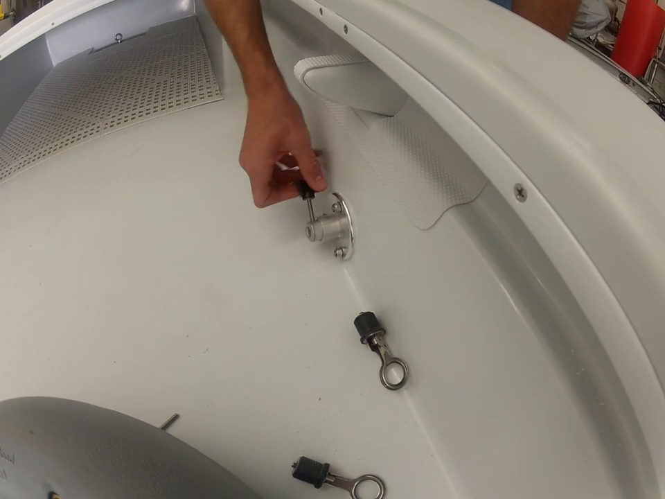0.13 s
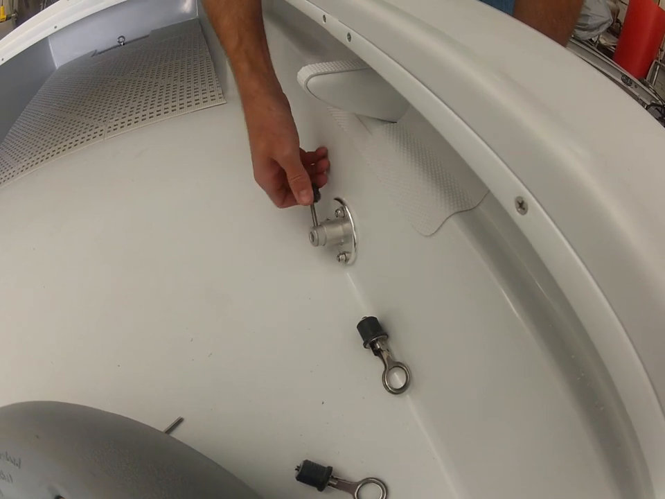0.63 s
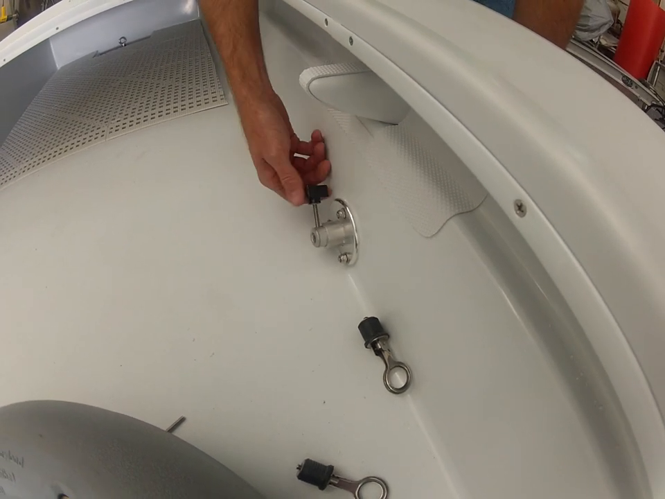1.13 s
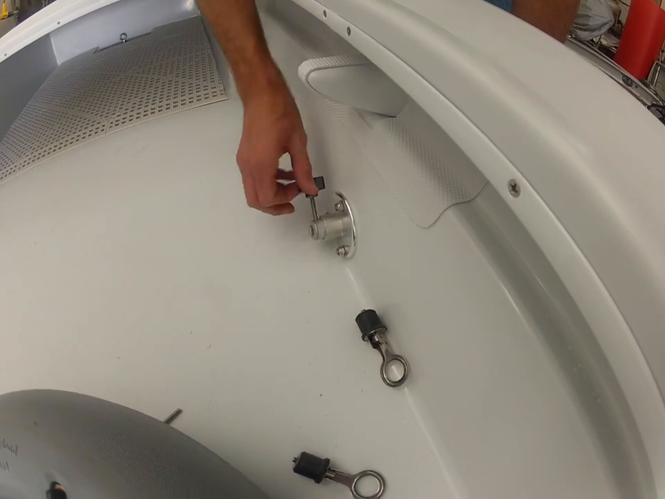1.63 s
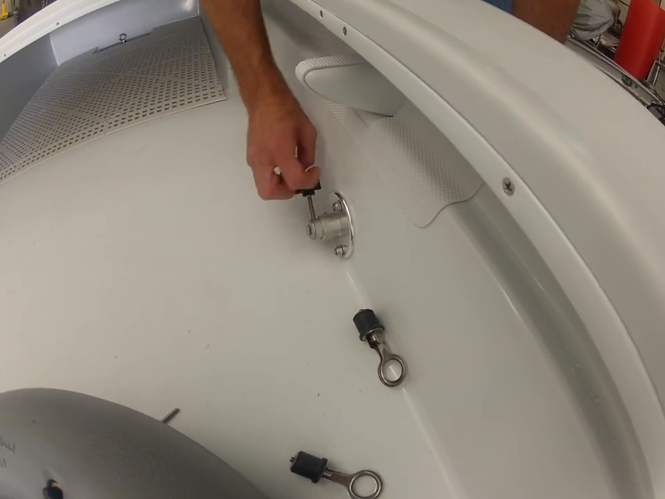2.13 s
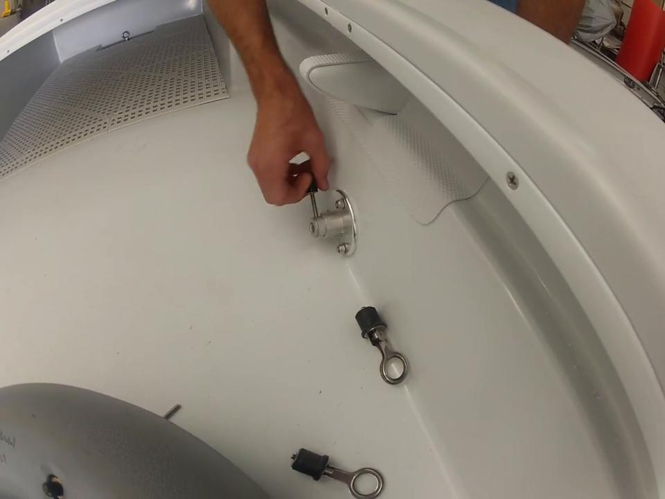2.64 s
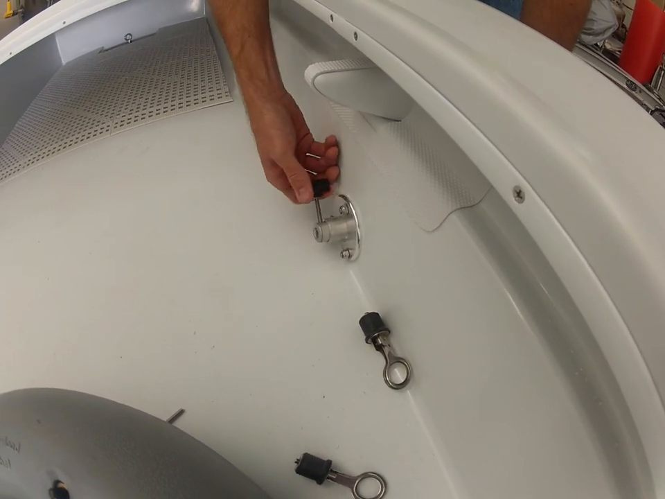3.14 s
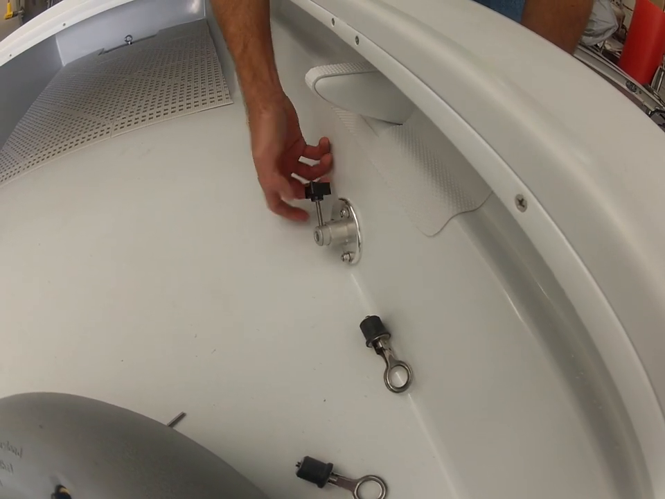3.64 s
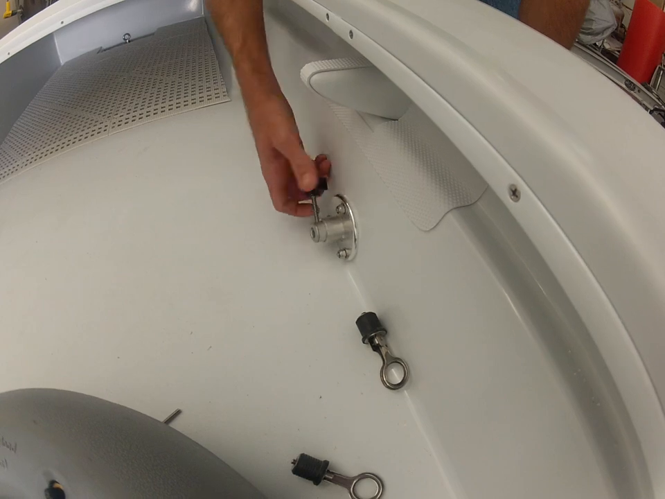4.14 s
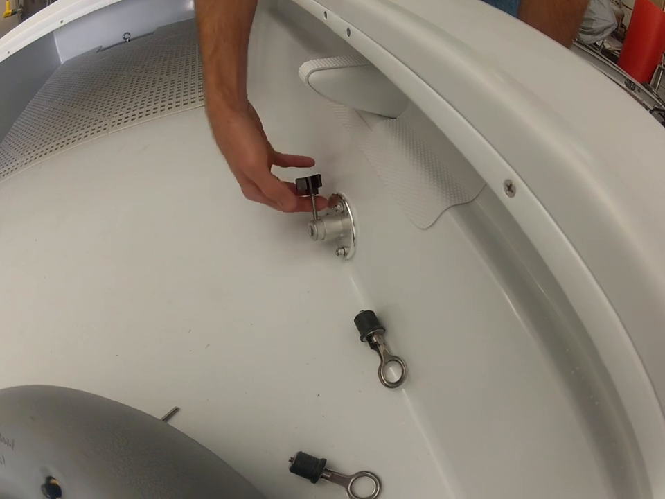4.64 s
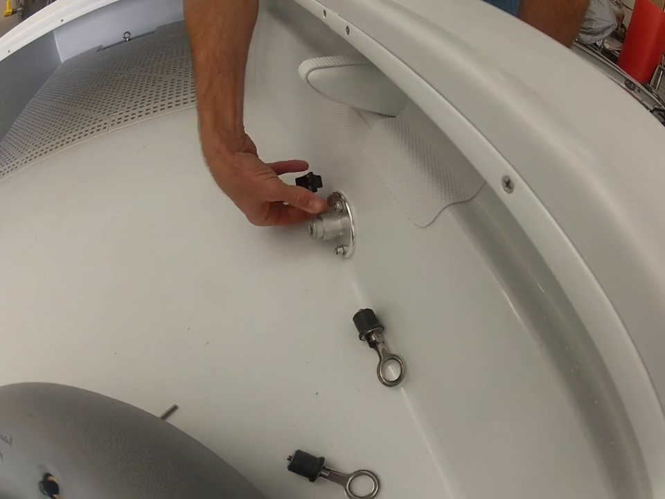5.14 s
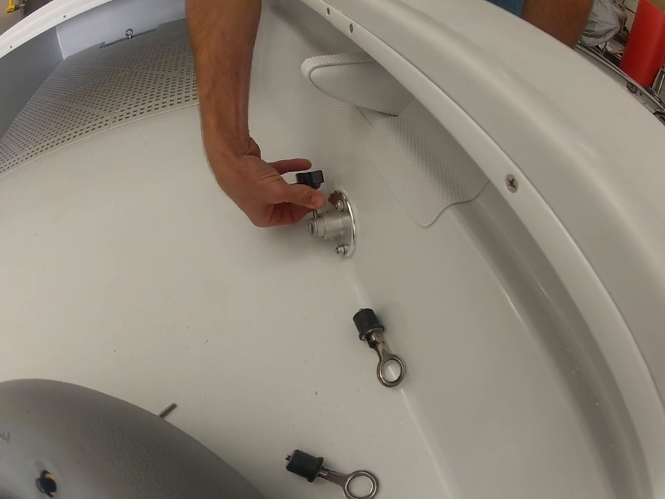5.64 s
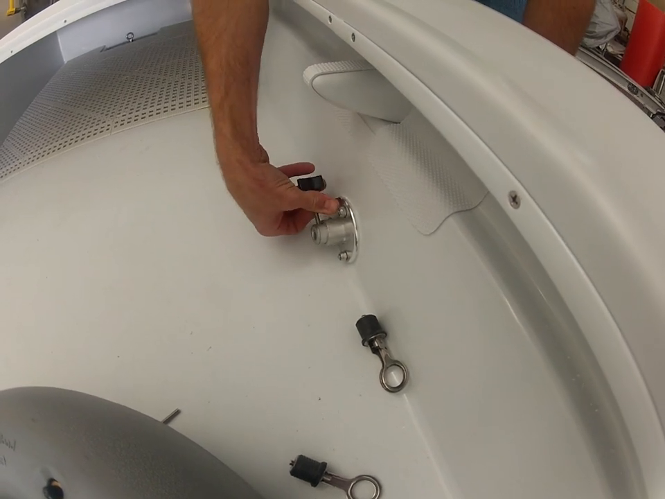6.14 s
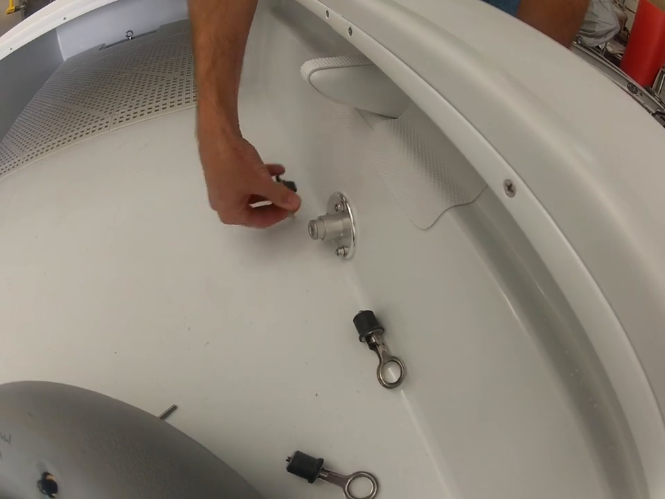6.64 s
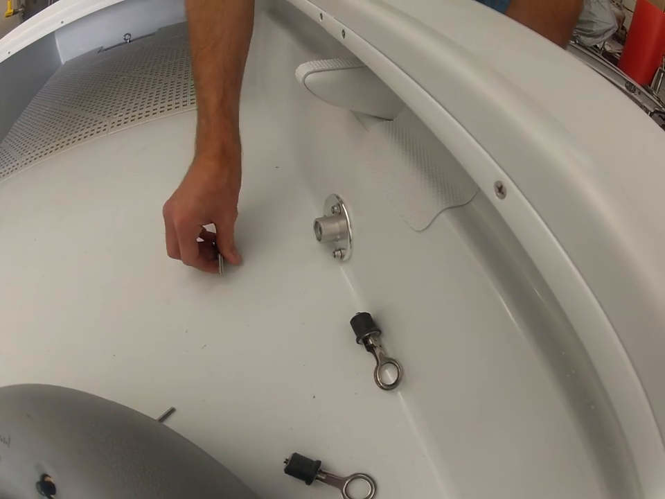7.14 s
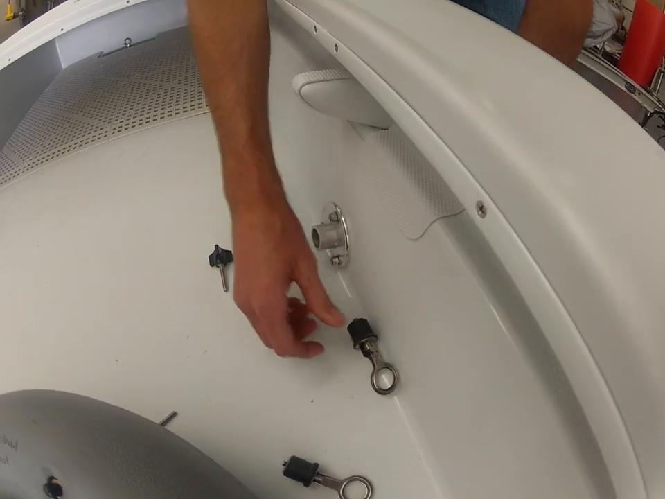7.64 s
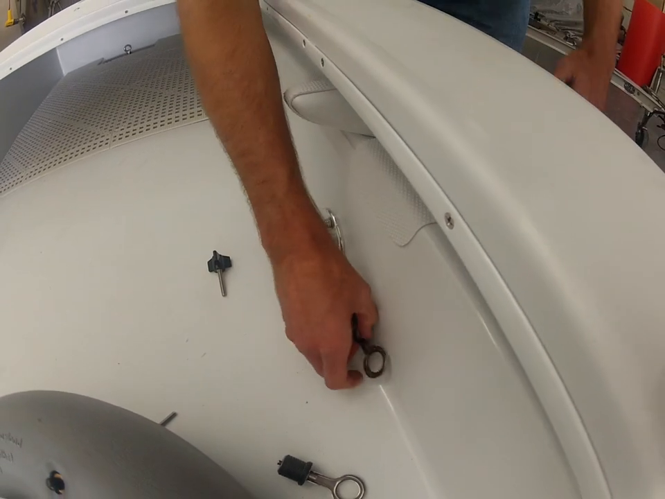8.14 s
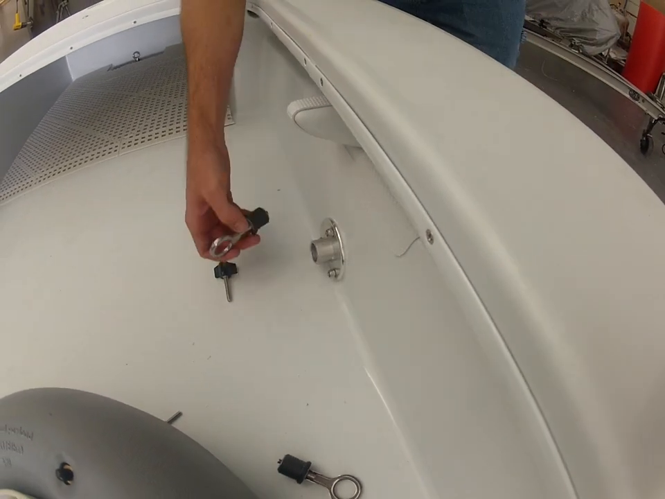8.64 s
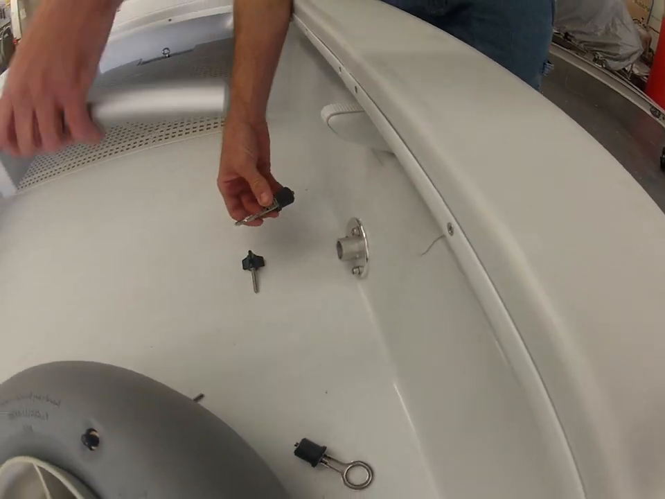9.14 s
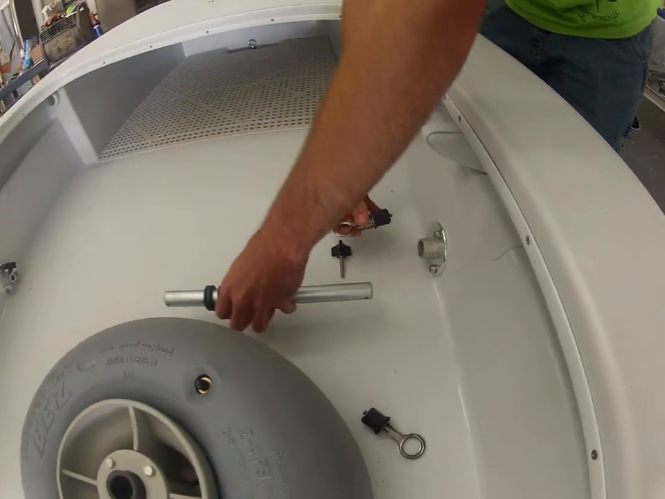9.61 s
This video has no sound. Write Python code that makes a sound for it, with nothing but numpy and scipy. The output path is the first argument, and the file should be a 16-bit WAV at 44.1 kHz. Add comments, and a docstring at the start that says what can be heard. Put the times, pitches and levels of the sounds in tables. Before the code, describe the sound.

Steady soft hiss and a low, drifting rumble from a cheap camera microphone run throughout, with a coarse, mirrored grit in the treble. From 0 to 2 seconds only a few barely audible steel ticks are heard. Around 2.4 to 3.3 seconds the clicks of a small pin in its bracket become slightly clearer, with another at 3.8 seconds followed by a very faint rub. Light irregular ticking continues from 4.4 to 6.4 seconds. At 7.0 to 7.4 seconds the pin is laid down: firmer taps, soft low hull thumps and short lumpy scrapes, strongest near 7.3. Another little drag and tap follow at 7.6, then clicks at 8.0 and 8.2. At 8.28 seconds one sharp, much louder steel knock hits the hull, hollow and briefly booming, with a smaller bounce at 8.34. Its short shed tail fades, leaving hiss and rumble that swells slightly towards the end, near 9.75 seconds.

```python
"""A hand turns a small steel pin out of a bracket in a hollow boat, lays it down and knocks a second pin on the hull.
Each contact is a noisy blow, modes near 2 kHz and duller echoes inside the boat; heavy ones thump the hull panels.
Now and then the steel drags in short, lumpy strokes of noise; a shed answers clicks and thumps with a noise tail.
The camera adds hiss and a drifting rumble, samples slowly and holds each sample: sounds are mirrored in the treble."""
import sys
import numpy as np
from scipy import signal
from scipy.fft import rfft, irfft, next_fast_len
from scipy.io import wavfile
from scipy.ndimage import uniform_filter1d, map_coordinates

SR = 44100
rng = np.random.default_rng(int(sys.argv[2]) if len(sys.argv) > 2 else 0)


def bounce(signal):
    """Save signal as a 16-bit WAV file at the path given by the first command-line argument."""
    frames = np.transpose(np.atleast_2d(signal))
    limited = np.clip(frames, -1, 1)
    pcm = np.round(limited * 32767).astype(np.int16)
    wavfile.write(sys.argv[1], SR, pcm)


def voltage_ratio(decibels):
    """Convert decibels (scalar or array-like) to amplitude ratios, 20 dB per decade."""
    exponent = np.asarray(decibels, float) / 20
    return 10 ** exponent


N = 429975  # length [samples]

# noise colour of steel touching steel: (frequency [Hz], relative density [dB per Hz])
CONTACT_COLOUR = [(700, -38.5), (1200, -12), (1600, -12.5), (2200, -1), (2700, -6.5), (3300, -14.5),
                  (3800, -26.5), (4800, -25.5), (5900, -31.5), (8000, -92)]


def unit(x):
    """Scale to rms 1."""
    return x / np.sqrt(np.mean(x ** 2) + 1e-20)


def along(points, hz):
    """Read (Hz, value) points on a log frequency axis."""
    f, v = np.transpose(points)
    return np.interp(np.log(hz + 1), np.log(f + 1), v)


def filtered(x, response):
    """Multiply the spectrum of x by a response of frequency."""
    m = next_fast_len(len(x) + 8192)
    hz = np.fft.rfftfreq(m, 1 / SR)
    return irfft(rfft(x, m) * response(hz), m)[:len(x)]


def noise(spectrum, count):
    """Coloured noise of rms 1."""
    white = rng.standard_normal(count)
    return unit(filtered(white, lambda hz: voltage_ratio(along(spectrum, hz))))


def ring(modes, t, spread_db, tilt):
    """One blow on a body: every mode at a new strength, dying at the rate its width sets."""
    luck_db = rng.normal(0, spread_db, len(modes))
    total = np.zeros(len(t))
    for (hz, width_hz, db), extra_db in zip(modes, luck_db):
        decay = np.exp(-np.pi * width_hz * t)
        total += voltage_ratio(db + extra_db + tilt(hz)) * decay * np.sin(2 * np.pi * hz * t)
    return total


def add(track, s, sound, wet_db):
    """Place a sound at s seconds with its own fresh answer from the shed."""
    wet = voltage_ratio(wet_db) * shed(sound)
    wet[:len(sound)] += sound
    track[round(s * SR):][:len(wet)] += wet


def clicks():
    """Steel on steel: a bright blow, ringing modes, and duller echoes that run round the boat, then stop."""
    # steel contacts: (time [s], level [dB], centre of the favoured modes [Hz],
    # hardness: cut of echoes and ringing under the blow [dB], extra edge near 3 kHz [dB])
    contacts = [(0.016, -57.5, 2250, 3, -5), (0.281, -60, 2090, 3, 3), (0.3, -61.5, 2340, 4, 2),
                (0.856, -60, 2110, 1, 2), (0.9753, -53.5, 2110, 4.5, 6), (2.4428, -46, 2080, 4.5, 4),
                (2.554, -58, 2240, 1, 14), (2.6, -45, 2170, 8, 18), (2.819, -56.5, 2250, 6, 12),
                (2.928, -56.5, 2560, 3, 12), (3.121, -60, 2100, 7, 2), (3.1403, -57.5, 2060, 6, 0),
                (3.301, -56.5, 2100, 3.5, 7), (3.7866, -46, 2100, 5.5, 13), (4.399, -51.5, 2250, 5, 14),
                (4.681, -56.5, 2250, 4, 7), (4.768, -61.5, 2520, 3.5, 8), (4.827, -63, 2590, 4, 4),
                (4.911, -60.5, 1820, 0, 6), (4.977, -59, 1760, 1.5, 10), (5.012, -49.5, 2130, 4.5, 0),
                (5.341, -60.5, 2080, 0.5, 4), (5.695, -57.5, 2080, 1, 0), (6.103, -55.5, 2170, 2, 2),
                (6.1945, -51.5, 1750, 6.5, 18), (6.284, -54.5, 2110, 3, 7), (6.306, -49, 2230, 5, 8),
                (6.431, -54.5, 2130, 2.5, 8), (7.009, -38, 2260, 8, -7), (7.061, -53, 2600, 9, 6),
                (7.16, -56, 2150, 1, 4), (7.1865, -50.5, 2260, 10, -8), (7.29, -52, 2170, 2, -7),
                (7.305, -29.5, 2090, 8, 6), (7.3557, -43, 2180, 6.5, -14), (7.374, -46.5, 2210, 9, -8),
                (7.674, -47.5, 2200, 8, 4), (7.985, -49, 2180, 7, -5), (8.1798, -34, 1950, 5, 5),
                (8.2839, -11, 2100, 10.5, -1), (8.2898, -21.5, 2210, 17, 11), (8.3384, -24.5, 2210, 32, 5),
                (8.349, -32, 2160, 23.5, 5)]
    # modes of pin and bracket: (frequency [Hz], width [Hz], relative level [dB])
    steel_modes = [(1378, 67, -13), (1805, 60, -7.5), (2060, 40, -4.5), (2210, 29.7, -2.5), (2360, 45, -8),
                   (2560, 59, -5.5), (2720, 50.3, -13.5), (2960, 109, -11), (3360, 120, -23),
                   (4810, 200, -24.5)]
    hard_s, soft_extra_s, hardness_fall_db = 0.018, 0.03, 4  # a soft rubbing touch echoes longer than a hard tap
    track, t = np.zeros(N + SR), np.arange(SR // 8) / SR

    def edge(hz):
        """A hard corner wakes the pin's short high mode."""
        return np.exp(-(np.log2((hz + 1) / 3200) / 0.75) ** 2)

    for s, db, centre_hz, hardness_db, edge_db in contacts:
        echo_s = hard_s + soft_extra_s * np.exp(-abs(hardness_db) / hardness_fall_db)

        def tilt(hz):
            """Where the pin is touched decides which modes speak."""
            return np.maximum(-30 * np.log2((hz + 1) / centre_hz) ** 2, -7)

        blow = unit(filtered(noise(CONTACT_COLOUR, len(t)), lambda hz: voltage_ratio(edge_db * edge(hz))))
        blow *= 1 / (1 + (t / 0.0035) ** 5)  # over in a few ms
        blow *= voltage_ratio(6.0) / np.abs(blow).max()

        echoes = unit(filtered(noise(CONTACT_COLOUR, len(t)), lambda hz: voltage_ratio(tilt(hz))))
        echoes *= voltage_ratio(-3.5 - 74 * t) / (1 + (t / echo_s) ** 6)
        echoes *= 1 - np.exp(-(t / 0.0031) ** 2)  # the first walls are a few ms away

        ringing = voltage_ratio(-6.0) * ring(steel_modes, t, 5.0, tilt)
        sound = blow + voltage_ratio(-hardness_db) * (echoes + ringing)
        onset = 1 - np.exp(-t / 0.0011)
        add(track, s - 0.0008, voltage_ratio(db) * sound * onset, wet_db=-12.5)
    return track[:N]


def thumps():
    """A heavier contact sets the hull panels booming: ringing modes and bands of noise that swell and die."""
    # hull thumps: (time [s], level [dB], brightness [dB per octave], factor on the band decay times [ratio])
    knocks = [(0.302, -46, -3, 0.33), (3.787, -47, -4, 0.67), (4.399, -49.5, -1.5, 0.8),
              (7.009, -42.5, -4, 1.54), (7.061, -41, -8, 0.86), (7.19, -51.5, 0, 1.7),
              (7.304, -39.5, -4.5, 0.98), (7.36, -51, -7, 0.94), (7.66, -48.5, -3.5, 1.2),
              (8.2842, -16, 1.5, 0.99), (8.339, -29, -0.5, 0.74)]
    # hull panel modes: (frequency [Hz], width [Hz], relative level [dB])
    panel_modes = [(115.6, 15, -15.5), (203, 12, -4.5), (229.8, 25, -1), (346.2, 80, 2), (535, 40, -2.5),
                   (660, 37, -1), (830, 60, -3.5), (940, 65, -5), (1220, 90, -10)]
    # hull noise bands, the big slow panels swell late:
    # (centre [Hz], relative level [dB], rise [s], t60 at factor 1 [s])
    boom_bands = [(99.8, -11, 0.089, 0.58), (212, -1.5, .018, 0.24), (350, -3.5, .012, 0.251),
                  (560, -3, 0.0064, 0.13), (804, 2, 0.001002, 0.066), (1300, -17.5, .001, 0.03)]
    track, t = np.zeros(N + SR), np.arange(SR // 2) / SR
    for s, db, bright_db, factor in knocks:
        def tilt(hz):
            return bright_db * np.log2(hz / 400)

        sound = voltage_ratio(-11.5) * ring(panel_modes, t, 1.9, tilt) * (1 - np.exp(-t / 0.0027))
        for hz, band_db, rise_s, t60_s in boom_bands:
            shape = [(hz / 3, -60), (hz / 1.3, -3), (hz, 0), (hz * 1.3, -3), (hz * 3, -60)]
            decay_db = -60 * t / (t60_s * factor)
            swell = 1 - np.exp(-t / rise_s)
            sound += noise(shape, len(t)) * voltage_ratio(band_db - 8.5 + tilt(hz) + decay_db) * swell
        add(track, s - 0.0008, voltage_ratio(db) * sound, wet_db=-7.5)
    return track[:N]


def drags():
    """Sliding steel chatters: noise in lumps a few ms long; each stroke rises, holds and fades."""
    # strokes of the pin: (start [s], length of rise and hold [s], relative level [dB])
    strokes = [(3.928, 0.36, -67.5), (7.025, 0.077, -59.5), (7.154, 0.053, -57.5), (7.233, 0.075, -59),
               (7.588, 0.1, -55)]
    rise_s, fall_s = 0.016, 0.032
    t = np.arange(N) / SR
    slow_noise = uniform_filter1d(rng.standard_normal(N), SR // 200)
    lumps = unit(voltage_ratio(1.3 * unit(slow_noise)))  # the level wanders by 1.3 dB rms
    level = np.zeros(N)
    for s, length, db in strokes:
        rising = (t - s) / rise_s
        falling = 1 + (s + length - t) / fall_s
        level += voltage_ratio(db) * np.clip(np.minimum(rising, falling), 0, 1)
    # sliding steel also stirs the hull's upper panels
    hz = 950
    panels = noise([(hz / 3, -40), (hz / 1.5, -3), (hz * 1.3, -3), (hz * 3, -40)], N)
    return voltage_ratio(-7) * level * lumps * (noise(CONTACT_COLOUR, N) + voltage_ratio(-5.5) * panels)


def shed(x):
    """The shed's answer: a noise tail in which each frequency dies at its own speed."""
    # decay of the shed: (frequency [Hz], t60 [s])
    decay_times = [(80, .7), (200, .45), (700, 0.51), (2000, 0.47), (5000, 0.4)]
    hz, t, z = signal.stft(rng.standard_normal(SR // 2), SR, nperseg=512)
    decay = voltage_ratio(-60 * t / along(decay_times, hz)[:, None])
    tail = signal.istft(z * decay, SR, nperseg=512)[1]
    return signal.fftconvolve(x, tail / np.linalg.norm(tail))


def camera_noise():
    """Steady hiss, mostly common to both channels, with a rumble that drifts."""
    # hiss shared by both channels: (frequency [Hz], relative density [dB per Hz])
    shared_colour = [(12, -31.5), (20, -2), (44, -2.5), (148, -8), (183, -8), (275, -10), (422, -15),
                     (523, -17.5), (714, -22.5), (785, -21.5), (863, -24.5), (1810, -25.5), (4690, -31),
                     (5950, -37), (7740, -71), (13100, -120)]
    # hiss of opposite sign in the two channels: (frequency [Hz], relative density [dB per Hz])
    apart_colour = [(12, -32), (20, -0.5), (145, -4), (183, -2.5), (549, -12), (950, -15.5), (1260, -16),
                    (2580, -17), (4920, -15), (5950, -22), (7740, -54.5), (13100, -120)]
    # course of the rumble: (time [s], relative level [dB])
    rumble_course = [(0.0, -67.5), (4.0, -69), (6.1, -68), (7.2, -66), (8.8, -66), (9.75, -61.5)]
    drift_db, drift_per_s = 1, 2.5  # size of the random drift, new random values per second
    s, db = np.transpose(rumble_course)
    t = np.arange(N) / SR
    drift = map_coordinates(rng.standard_normal(64), [t * drift_per_s])
    hiss = voltage_ratio(-60) * noise(shared_colour, N)
    low = filtered(hiss, lambda hz: 1 / (1 + (hz / 110) ** 4))
    rumble = unit(low) * voltage_ratio(np.interp(t, s, db) + 3.0 + drift_db * drift)
    mid = hiss - low + rumble  # the rumble replaces the lows of the hiss
    side = voltage_ratio(-78) * noise(apart_colour, N)
    return np.array([mid + side, mid - side])


def scene():
    """One microphone hears all contacts in the middle; the camera's noise lies in two channels."""
    return clicks() + thumps() + drags() + camera_noise()


def band_limit(x):
    """A steep low-pass at the top of the band."""
    return signal.sosfilt(signal.butter(12, 16520, fs=SR, output="sos"), x)


def record(dry):
    """The camera samples at 12 kHz and holds each value four times: mirror images about 6 and 12 kHz."""
    slow = signal.resample_poly(dry, 40, 147, axis=1)  # 44.1 to 12 kHz
    held = np.repeat(slow, 4, axis=1)  # 48 kHz
    held = signal.resample_poly(held, 147, 160, axis=1)[:, :N]  # back to 44.1 kHz
    dulled = [filtered(channel, lambda hz: 1 / (1 + (hz / 15800) ** 40)) for channel in held]
    return band_limit(np.array(dulled))


dry = scene()
out = record(dry)
bounce(out)
```